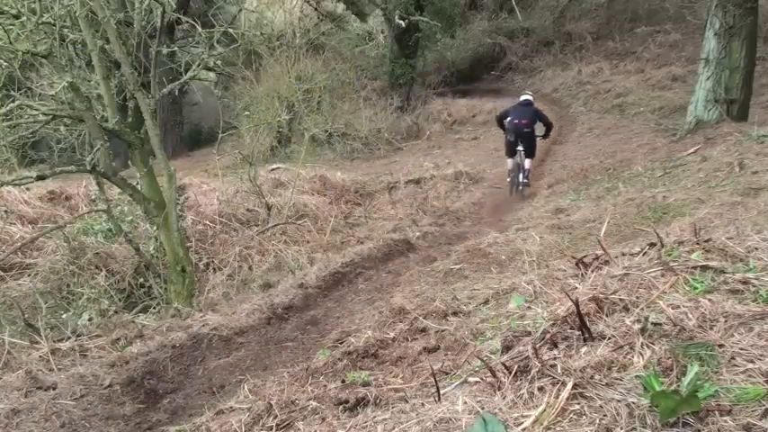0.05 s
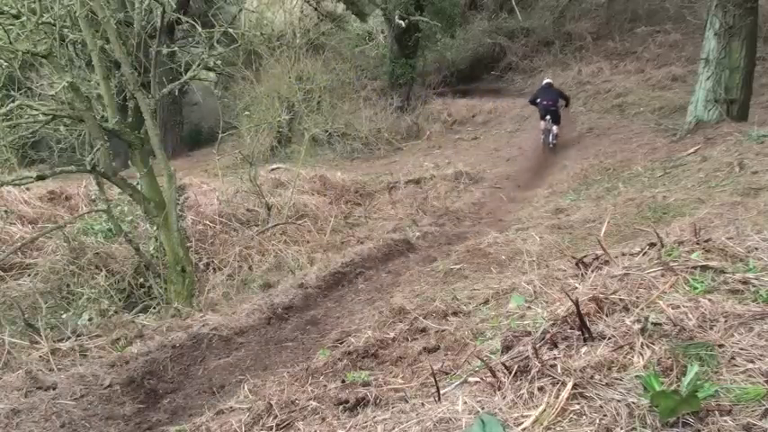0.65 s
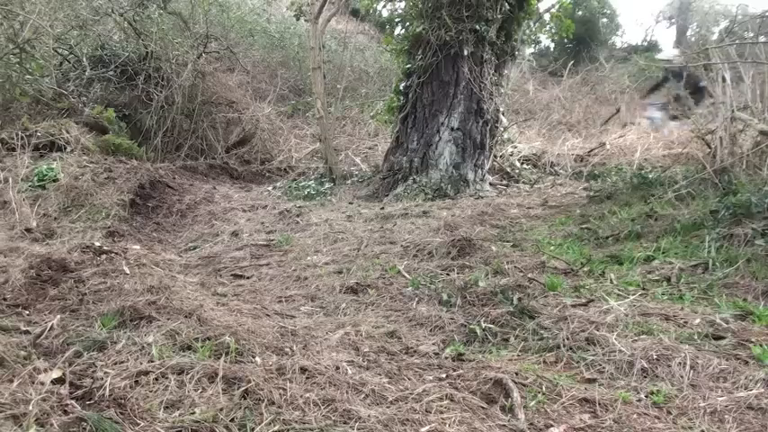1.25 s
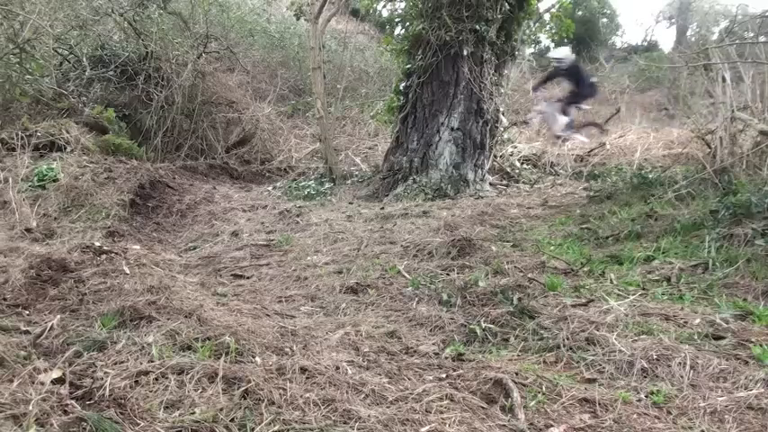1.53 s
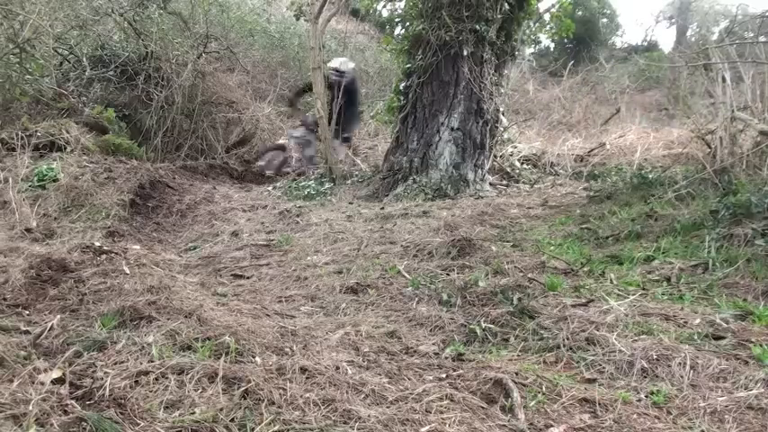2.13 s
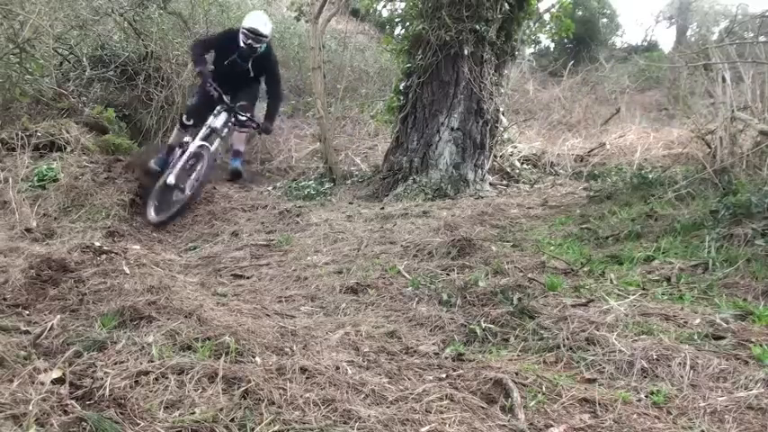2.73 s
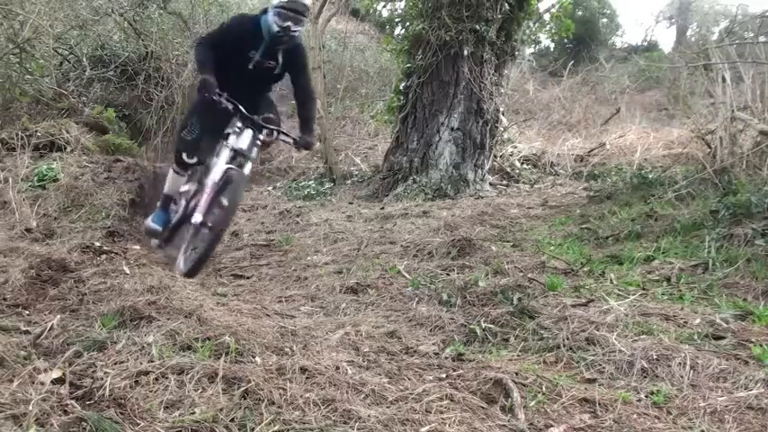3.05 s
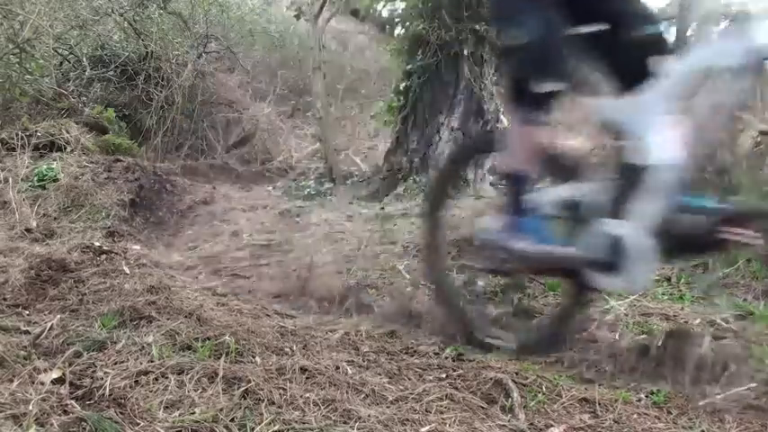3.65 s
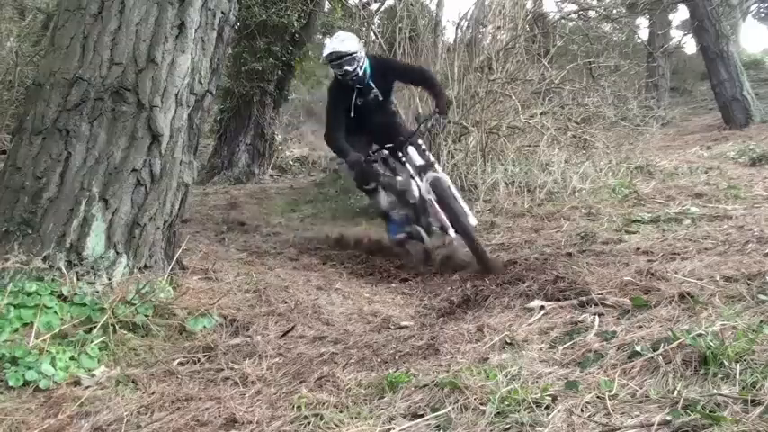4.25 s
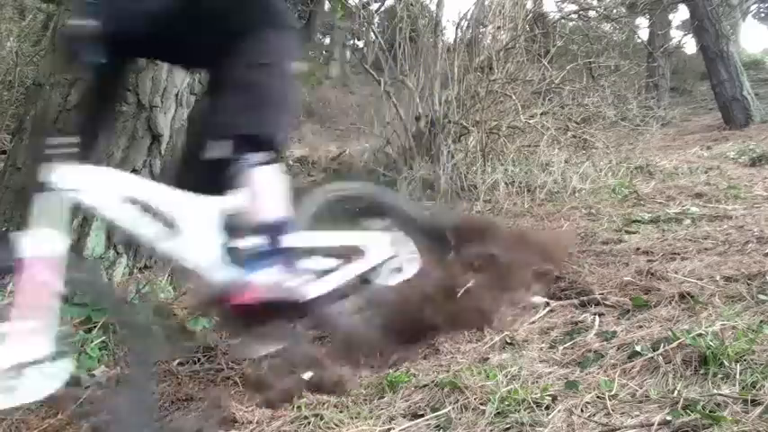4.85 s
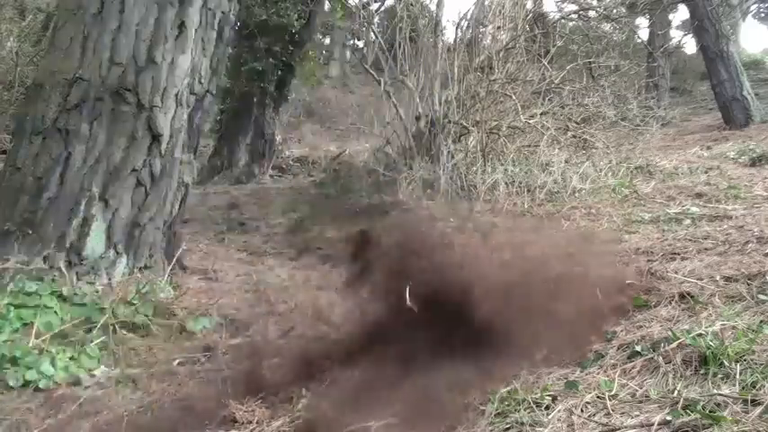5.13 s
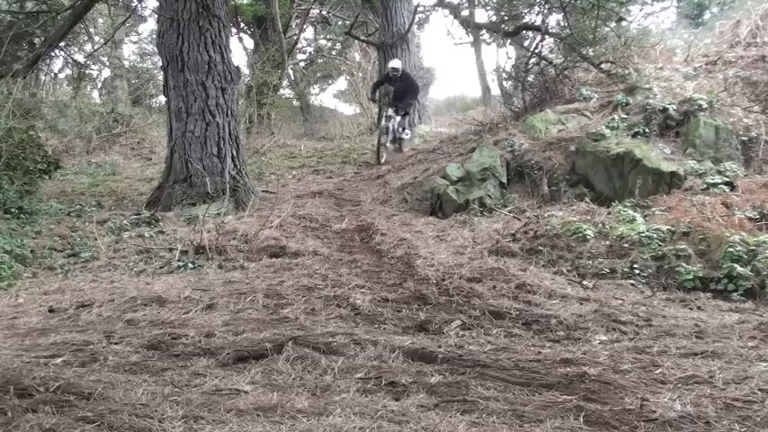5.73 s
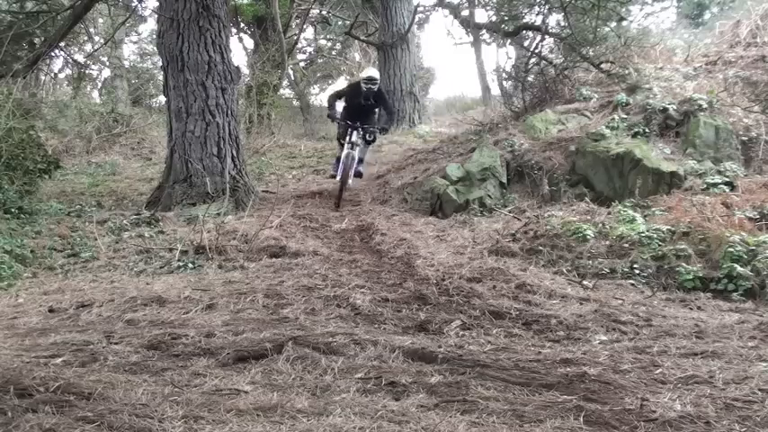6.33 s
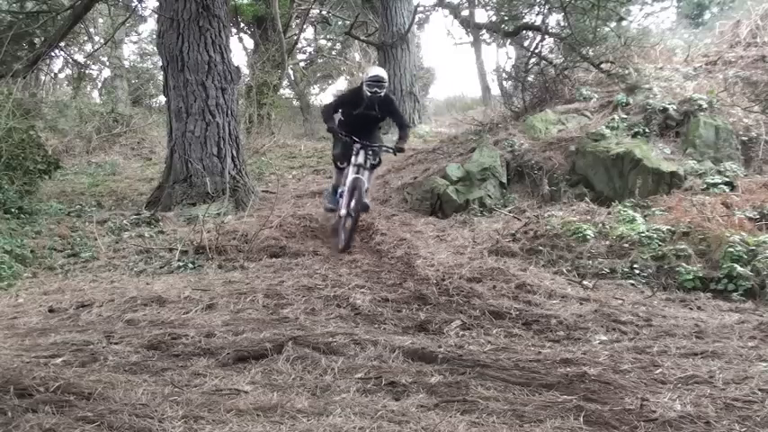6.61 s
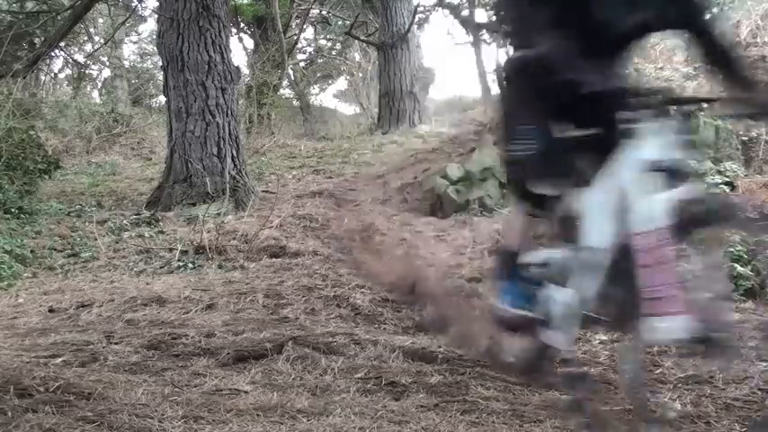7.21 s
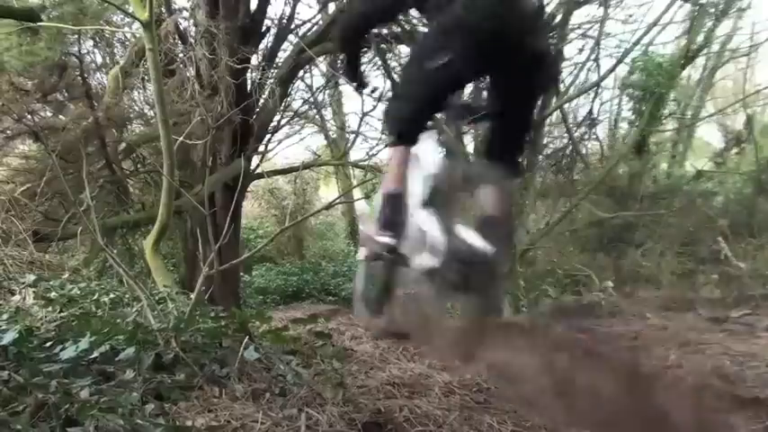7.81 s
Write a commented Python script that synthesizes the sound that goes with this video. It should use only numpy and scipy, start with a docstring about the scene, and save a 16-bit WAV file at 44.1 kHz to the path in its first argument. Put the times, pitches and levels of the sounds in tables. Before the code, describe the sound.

Coasting mountain bikes buzz and tick past, one far off and then several close, with crunching tyres, metal clacks and thin brake squeals.

```python
"""A dry woodland trail, stereo microphone at its edge: five short mountain bike passes, each fading out
as the next comes in, the first far off, the rest within about a metre at their nearest.
Freehub pawls buzz and set the wheels ringing, tyres crunch over dirt and needles, twigs snap,
loud pawl clicks and chain hits clack, and disc brakes squeal very high.
Wind buffets the microphone; dull thumps come from its puffs and from tyres on the ground."""
import sys
import numpy as np
from scipy import signal
from scipy.fft import rfft, irfft, next_fast_len
from scipy.io import wavfile

SR = 44100
rng = np.random.default_rng(int(sys.argv[2]) if len(sys.argv) > 2 else 0)


def unload_wav(signal):
    """Save mono or channel-first audio to the path in sys.argv[1] as 16-bit WAV at rate SR, clipped to [-1, 1]."""
    wavfile.write(
        sys.argv[1],
        SR,
        np.round(np.clip(np.atleast_2d(signal).T, -1, 1) * 32767).astype(np.int16),
    )


N = 347056
T = np.arange(N) / SR

# freewheeling: (time [s], pawl clicks [1/s], crispness [0 scattered wash to 1 direct clicks])
COASTING = [(.5, 112.7, .35), (.75, 89.4, .85), (.98, 90.1, .45), (1.7, 113.1, .3), (2.3, 66.1, .2),
            (3.3, 60.9, .35), (3.72, 52, .6), (3.98, 81.3, .68), (4.12, 38.2, .75), (4.47, 76.1, .5),
            (4.85, 31.1, .3), (4.95, 60.9, .86), (5.2, 59.9, .8), (5.5, 90, .05), (5.95, 92, .45),
            (6.55, 125, .15), (7.1, 112, .45), (7.7, 116, .5)]
# dips between passes: (start [s], quietest [s], end [s], first drop [dB], lowest level [dB])
LEVEL_DIPS = [(0.992, 1.049, 1.106, -0.5, -45), (3.996, 4.054, 4.14, -18.5, -40),
              (5.227, 5.325, 5.41, -16.5, -43), (7.45, 7.531, 7.604, -16.5, -45)]


def pawls(jitter_teeth=.025):
    """One click each time the pawls drop off a ratchet tooth."""
    per_s, _ = in_time(COASTING)
    teeth = np.maximum.accumulate(np.floor(np.cumsum(per_s) / SR + jitter_teeth * drift(30)))
    strength = from_db(1.7 * rng.standard_normal(N))
    return rms_one(np.diff(teeth, prepend=teeth[0]) * strength / np.sqrt(per_s))


def freehub(clicks, level_db, treble_db, shell_share):
    """Each pawl click is a crack and a short rattle in the hub shell, with a wash scattered by trees."""
    # tone of the buzz: (frequency [Hz], level [dB])
    spectrum = [(800, -14), (1200, -10.5), (1700, -5), (2400, -2), (3200, -4), (5500, -6), (8200, -6),
                (11800, -4), (15100, -10.5), (16000, -34)]
    # hub shell resonances: (frequency [Hz], width [Hz], level [dB])
    shell_modes = [(1820, 96, -3), (2363, 140, 3), (2600, 120, -3.5), (3200, 190, -14), (7370, 330, -3),
                   (10170, 820, -3), (11600, 330, -11)]
    # louder in the open, softer behind trunks or under braking: (middle [s], length [s], change [dB])
    buzz_swells = [(.75, 0.44, 6), (1.4, 1, 4), (1.72, 0.39, 10), (1.88, 0.26, -10.5), (2.85, 0.96, -3.5),
                   (3.3, 0.41, 2.5), (4.2, 0.6, 3.5), (4.64, .3, -5), (4.82, .3, -8), (5.62, 0.98, -2.5),
                   (6.74, 0.59, 3.5), (7.22, 0.41, -4)]
    _, crisp = in_time(COASTING)
    # the wheel answers every click alike, which gives the buzz its pitch
    age = np.arange(SR // 40) / SR
    answer = rng.standard_normal(len(age)) * np.exp(-age / 0.0018)
    wheel = rms_one(signal.fftconvolve(clicks, answer)[:N])
    rattle = rms_one(die_away(clicks, decay_s=0.0029) * stereo_noise(side_db=-18.5))
    wash = stereo_noise(side_db=-16.5) * from_db(2.34 * drift(44))
    direct = rms_one(0.24 * clicks + 0.69 * wheel + rattle)
    buzz = np.sqrt(crisp) * direct + np.sqrt(1 - crisp) * wash
    shell = sum(from_db(db) * resonate(buzz, hz, width) for hz, width, db in shell_modes)
    buzz = shelf(colour(buzz + shell_share * shell, spectrum), 6600, treble_db)
    return from_db(level_db + swells_db(buzz_swells)) * buzz


def tyres(level_db, bumps_db=1.63, grit_db=-8.5):
    """Knobs crush soil, stones and needles: grains crackle over a rush, shaken by the bumps."""
    # tyre rush: (frequency [Hz], level [dB])
    spectrum = [(150, -1.5), (400, -3.5), (700, -3.5), (1050, -6), (1300, -6), (2500, -13.5)]
    # the tread bites into loose ground or skims it: (middle [s], length [s], change [dB])
    skids = [(1.25, 0.46, 1.5), (2.3, 1.5, -1.5), (3.5, 0.68, 6), (5.7, 2.4, 1), (7.1, 0.39, -6),
             (7.37, 0.21, 5.5), (7.64, 0.12, 8)]
    crunch = rms_one(die_away(grains(500, spread_db=3), decay_s=0.0013) * stereo_noise(side_db=-10))
    grit = die_away(grains(280, spread_db=4), decay_s=0.00078) * stereo_noise(side_db=-9)
    grit = rms_one(band(grit, 1300, 8000))
    gain = from_db(level_db + swells_db(skids) + bumps_db * drift(18.7))
    rush = colour(0.65 * crunch + 0.76 * stereo_noise(side_db=-9.5), spectrum)
    return gain * (rush + from_db(grit_db) * grit)


def brakes(fade, flutter_db=3, attack_s=0.0016, waver_hz=200):
    """A dab of the pads sets the disc singing in a gliding, wavering tone; its echo follows the fade."""
    # squeals: (time [s], length [s], start pitch [Hz], end pitch [Hz], level [dB])
    squeals = [(.574, 0.021, 12700, 14130, -8), (.587, .016, 13900, 12860, -14),
               (.763, 0.039, 12560, 13100, -15.5), (.801, 0.033, 13500, 12450, -16),
               (0.882, 0.022, 12760, 12400, -23), (1.136, 0.092, 13140, 13300, -16),
               (1.293, .018, 13050, 13340, -14.5), (1.394, 0.027, 13050, 13500, -14.5),
               (1.812, .038, 13900, 14200, -16.5), (1.957, 0.085, 15500, 14730, -21),
               (2.01, 0.22, 14220, 14240, -16), (2.165, .06, 14900, 15500, -16.5),
               (2.306, .083, 15550, 15400, -14.5), (2.426, 0.044, 13400, 12870, -12.5),
               (2.578, .026, 14950, 14700, -18), (3.987, 0.052, 13000, 13400, -17.5),
               (4.643, 0.088, 15100, 15300, -17.5), (5.221, 0.092, 12620, 13700, -11.5),
               (7.448, 0.062, 13950, 14300, -13)]
    direct = np.zeros(N)
    waver, grip = drift(480), from_db(flutter_db * drift(130))
    for s, length, start_hz, end_hz, level_db in squeals:
        at = np.arange(round(s * SR), min(N, round((s + length) * SR)))
        progress = np.linspace(0, 1, len(at))
        hz = start_hz + (end_hz - start_hz) * progress + waver_hz * waver[at]
        attack = 1 - np.exp(-progress * length / attack_s)
        bite = attack * np.sqrt(np.abs(np.sin(np.pi * progress ** 0.48)))
        direct[at] += from_db(level_db) * bite * grip[at] * np.sin(2 * np.pi * np.cumsum(hz) / SR)
    echo = 0.86 * fade * woodland_echo(fade * direct)
    return signal.sosfilt(signal.butter(8, 11800, "high", fs=SR, output="sos"), direct + echo + 1e-18)


def drivetrain_clacks(ring_hz=2450, width_hz=500, ring_spread=0.093, decay_s=0.0055):
    """Loud irregular freehub clicks and chain hits: sharp metal clacks, each with its own ring."""
    # (time [s], level [dB])
    clacks = [(.585, -16), (2.498, -26), (2.625, -32), (3.771, -21), (3.813, -20), (3.87, -18.5),
              (3.9, -16.5), (3.93, -16), (3.958, -18), (4.607, -18), (4.717, -21), (4.842, -20.5),
              (4.874, -22.5), (4.911, -22), (4.941, -20), (5.002, -21), (5.044, -19.5), (5.433, -27.5),
              (6.554, -27.5), (6.588, -25.5), (6.693, -27), (6.719, -21.5), (6.796, -23), (6.89, -21),
              (7.355, -19), (7.412, -12), (7.425, -10.5), (7.442, -11.5)]
    out, noise = np.zeros((2, N)), stereo_noise(side_db=-13) * from_db(2.5 * drift(400))
    age = np.arange(SR // 20) / SR
    for (s, level_db), detune in zip(clacks, rng.standard_normal(len(clacks))):
        at = round(s * SR) + np.arange(len(age))
        burst = noise[:, at] * np.exp(-age / decay_s)
        hz = ring_hz * np.exp(ring_spread * detune)
        out[:, at] += from_db(level_db) * band(burst + 2.3 * resonate(burst, hz, width_hz), hz / 2, 10300)
    return out


def dull_thuds(attack_s=0.0018, band_ratio=1.51):
    """Tyres on the ground or wind puffs on the microphone: short dull thumps, each around one pitch."""
    # (time [s], level [dB], centre [Hz], decay [s])
    thuds = [(1.685, -24.5, 297, 0.02), (2.697, -26, 258, 0.037), (3.175, -30, 1100, .025),
             (3.393, -25, 1200, 0.01), (3.584, -24, 950, 0.019), (3.838, -19.5, 1010, 0.0089),
             (4.298, -32, 1150, 0.011), (4.472, -29, 1240, 0.023), (4.72, -32, 1200, .025),
             (4.783, -29, 845, 0.027), (5.22, -25, 1000, .006), (5.404, -29.5, 1100, 0.024),
             (6.433, -33.5, 810, 0.028), (6.566, -32, 650, 0.021), (7.2, -27, 400, .04),
             (7.273, -21, 400, .025), (7.304, -28, 850, .04), (7.351, -6.5, 650, .005),
             (7.404, -18.5, 790, 0.048)]
    out, noise = np.zeros((2, N)), stereo_noise(side_db=-12.5) * from_db(2 * drift(150))
    age = np.arange(SR // 5) / SR
    for s, level_db, hz, decay_s in thuds:
        at = round(s * SR) + np.arange(len(age))
        puff = rms_one(band(noise[:, at], hz / band_ratio, hz * band_ratio))
        out[:, at] += from_db(level_db) * puff * (1 - np.exp(-age / attack_s)) * np.exp(-age / decay_s)
    return out


def twigs(ring_hz=5000, width_hz=1500, crack_s=0.0018, splinter_s=0.012):
    """A twig breaks under a tyre: one crack, then a dying cluster of splinters, echoed by the trunks."""
    # snaps: (time [s], level [dB])
    snaps = [(0.408, -33), (.541, -29), (2.104, -32.5), (2.147, -29), (2.275, -30.5), (2.311, -27),
             (2.363, -29), (2.413, -26), (2.481, -29), (2.607, -27.5), (3.355, -16.5), (3.393, -22.5),
             (4.185, -27), (5.405, -26.5), (6.056, -30.5), (6.328, -27.5), (6.712, -18.5), (7.816, -10),
             (7.836, -15)]
    cracks, splinters = np.zeros(N), 0.4 * grains(500, spread_db=2)
    for s, level_db in snaps:
        at = round(s * SR)
        cracks[at] += from_db(level_db)
        dying = np.exp(-np.minimum(T[:N - at] / splinter_s, 20))
        cracks[at:] += from_db(level_db) * splinters[at:] * dying
    burst = die_away(cracks, crack_s) * stereo_noise(side_db=-16)
    direct = band(burst + resonate(burst, ring_hz, width_hz), ring_hz / 2, ring_hz * 2)
    return direct + 0.38 * woodland_echo(direct.mean(0))


def wheel_whirr(clicks, distance_db):
    """The pawls shake rotors and spokes, which ring: ticking close by, a sustained whirr from afar."""
    # narrow ringing bands: (start [s], end [s], start pitch [Hz], end pitch [Hz], level [dB])
    whirrs = [(0.679, 1.079, 2345, 2035, -38.5), (1.14, 1.3, 4620, 5150, -45.5),
              (1.2, 1.82, 2650, 2590, -41), (1.65, 1.8, 3450, 3550, -42), (1.58, 1.81, 4790, 4890, -41.5),
              (5.03, 5.242, 2150, 1650, -29.5)]
    direct = from_db(distance_db)
    ticks = rms_one(die_away(clicks * rng.standard_normal(N), decay_s=.001))
    shake = direct * ticks + np.sqrt(1 - direct ** 2) * drift(260)
    out = np.zeros(N)
    for start, end, start_hz, end_hz, level_db in whirrs:
        at = np.arange(round(start * SR), round(end * SR))
        swell = np.sqrt(np.abs(np.sin(np.linspace(0, np.pi, len(at)))))
        phase = 2 * np.pi * np.cumsum(np.linspace(start_hz, end_hz, len(at))) / SR
        out[at] += from_db(level_db) * swell * shake[at] * np.sin(phase)
    return out


def wind(level_db, buffet_db=2.5, small_eddies_hz=150):
    """Eddies on the microphone: big slow ones reach both sides, small ones differ and come and go."""
    # rumble: (frequency [Hz], level [dB])
    spectrum = [(20, 0.5), (60, 2.5), (120, -0.5), (208, -4.5), (350, -11), (690, -25.5), (1000, -34)]
    # gusts and lulls: (middle [s], length [s], change [dB])
    gusts = [(1.16, 0.24, 8.5), (1.35, 0.3, 4), (1.5, .12, 4), (1.72, 0.11, 4.5), (1.88, 0.14, -6),
             (1.96, 0.13, 6), (2.22, 0.6, 3), (2.54, .26, -12), (2.73, 0.12, 3), (3.01, 0.13, -6.5),
             (3.35, 1, 2), (3.62, 0.16, 7.5), (4.34, 0.11, 7), (5.15, 0.38, -7), (6.58, 0.23, 7),
             (7.38, 0.17, 7.5), (7.66, 0.24, 4)]
    # smoother air loses its small eddies: (middle [s], length [s], change above the rumble [dB])
    smooth_spells = [(2.18, 0.73, -6.5)]
    mid, side = rng.standard_normal((2, N))
    eddies = mid + from_db(-5.5) * band(side, 83, 1050) * [[1], [-1]]
    rumble = colour(band(eddies, 27.4, 1360), spectrum)
    gain = from_db(level_db + swells_db(gusts) + buffet_db * drift(28))
    return gain * shelf(rumble, small_eddies_hz, swells_db(smooth_spells))


def woodland_echo(x, t60_s=0.29):
    """Trunks and banks scatter a dense, short tail."""
    age = np.arange(SR * 3 // 4) / SR
    mid, side = rng.standard_normal((2, len(age)))
    tail = (mid + from_db(-29) * side * [[1], [-1]]) * from_db(-60 * age / t60_s) * (age > .004)
    return signal.fftconvolve(x[None], tail / np.sqrt(np.sum(tail[0] ** 2)), axes=1)[:, :N]


def dip_gain():
    """Between passes the level sinks briefly and swells back."""
    corners = []
    for start, low, end, drop_db, depth_db in LEVEL_DIPS:
        corners += [(start - .004, 0), (start + 0.0012, drop_db), (low, depth_db), (end, 0)]
    s, level_db = np.transpose(corners)
    return np.interp(T, s, from_db(level_db))


def nearness_db(along_m, nearest_m):
    """Level falls as one over distance from the microphone; 0 dB at the nearest point."""
    return 20 * np.log10(nearest_m / np.hypot(along_m, nearest_m))


def together_db(a_db, b_db):
    """Level of two unrelated sounds together."""
    return 20 * np.log10(np.hypot(from_db(a_db), from_db(b_db)))


def swells_db(rows):
    """Each row is a smooth swell or sag of level."""
    t = T[::64]
    level_db = sum(db * np.cos(np.pi * np.clip((t - s) / length, -.5, .5)) ** 2 for s, length, db in rows)
    return np.interp(T, t, level_db)


def in_time(rows):
    """Each column of a curve, sample by sample."""
    s, *columns = np.transpose(rows)
    return [np.interp(T, s, c) for c in columns]


def drift(rate_hz):
    """Smooth random wander of rms about 1."""
    step, settle = 40, 2000
    r = np.exp(-2 * np.pi * rate_hz * step / SR)
    slow = signal.lfilter([1], [1, -2 * r, r * r], rng.standard_normal(N // step + settle + 2))[settle:]
    return np.interp(np.arange(N) / step, np.arange(len(slow)), rms_one(slow))


def stereo_noise(side_db):
    """White noise with a given side level against the middle."""
    mid, side = rng.standard_normal((2, N))
    return rms_one(mid + from_db(side_db) * side * [[1], [-1]])


def grains(per_s, spread_db):
    """Random clicks, mostly small and a few large."""
    return (rng.random(N) < per_s / SR) * from_db(spread_db * np.minimum(rng.exponential(1, N), 4))


def die_away(x, decay_s):
    """Each click becomes an exponential tail of the same height."""
    return signal.lfilter([1], [1, -np.exp(-1 / (decay_s * SR))], x + 1e-18)


def resonate(x, hz, width_hz):
    """One resonance, gain 1 at its peak."""
    r = np.exp(-np.pi * width_hz / SR)
    feedback = [1, -2 * r * np.cos(2 * np.pi * hz / SR), r * r]
    return signal.lfilter(np.array([1, 0, -1]) * (1 - r * r) / 2, feedback, x + 1e-18)


def colour(x, spectrum, skirt_db_per_octave=15):
    """Shape by a spectrum whose ends fall away; rms 1."""
    hz, level_db = np.transpose(spectrum)
    size = next_fast_len(N + SR // 10)
    octave, known = np.log2(np.maximum(np.arange(size // 2 + 1) * SR / size, 1)), np.log2(hz)
    outside = np.abs(octave - np.clip(octave, known[0], known[-1]))
    gain = from_db(np.interp(octave, known, level_db) - skirt_db_per_octave * outside)
    return rms_one(irfft(rfft(x, size) * gain, size)[..., :N])


def band(x, low_hz, high_hz):
    """Band-pass with gentle skirts."""
    return signal.sosfilt(signal.butter(2, [low_hz, high_hz], "band", fs=SR, output="sos"), x + 1e-18)


def shelf(x, edge_hz, change_db):
    """Raise or lower everything above an edge."""
    top = signal.sosfiltfilt(signal.butter(2, edge_hz, "high", fs=SR, output="sos"), x)
    return x - top + from_db(change_db) * top


def widen(x, width_db):
    """Raise or lower the difference between the two sides."""
    return x.mean(0) + from_db(width_db) * (x - x.mean(0))


def from_db(db):
    return 10 ** (np.asarray(db) / 20)


def rms_one(x):
    return x / np.sqrt(np.mean(x ** 2) + 1e-20)


def scene(speed_m_per_s=5.06, front_lead_s=0.064, far_tyres_db=-46, treble_loss_db_per_db=0.19):
    """Each bike rides a straight line past the microphone; position sets level, brightness and pan."""
    # one row a pass: (nearest at [s], nearest distance [m], freehub when nearest [dB],
    # tyres when nearest [dB], draught when nearest [dB], breeze [dB], freehub treble [dB], width [dB],
    # left minus right coming [dB], left minus right going [dB], hub shell ring [gain])
    passes = [(-3, 8.1, -28.6, -37.5, -55, -50.5, 0.59, -6.5, -5.5, 0.9, 0.67),
              (4, 1.21, -26, -36.5, -33, -28, 1.34, 2, 1, -5, 0.62),
              (5, 1.06, -25, -42, -56, -41, 1.1, 0, -1, 8, 0.33),
              (7.5, 0.73, -21.5, -29, -25, -50.5, -0.33, -1, 0.5, -6, 0.43),
              (7.71, 0.58, -20.5, -29, -25, -44, 1.8, 1.5, -10.5, 4, 0.59)]
    # each pass hands over at the bottom of a dip
    current = np.searchsorted([low for _, low, *_ in LEVEL_DIPS], T)
    (nearest_s, nearest_m, hub_db, tyre_db, draught_db, breeze_db,
     treble_db, width_db, coming_db, going_db, shell_share) = np.array(passes)[current].T
    along_m = speed_m_per_s * (T - nearest_s)
    rear_db = nearness_db(along_m, nearest_m)
    # the front tyre and the draught arrive before the rear hub
    front_db = nearness_db(along_m + speed_m_per_s * front_lead_s, nearest_m)
    pan_db = coming_db + (going_db - coming_db) * (.5 + np.arctan2(along_m, nearest_m) / np.pi)
    fade = dip_gain()
    rolling = tyres(together_db(tyre_db + front_db, far_tyres_db))  # direct, plus scatter from the wood
    clicks = pawls()
    hub = freehub(clicks, hub_db + rear_db, treble_db + treble_loss_db_per_db * rear_db, shell_share)
    air = wind(together_db(draught_db + front_db, breeze_db))
    riding = rolling + hub + wheel_whirr(clicks, rear_db) + drivetrain_clacks() + twigs() + dull_thuds()
    passing = widen(fade * riding + brakes(fade), width_db)
    return passing * from_db(pan_db * np.array([[.5], [-.5]])) + widen(fade * air, width_db)


def record(dry, cutoff_hz=16100):
    """The recorder rounds the peaks and cuts the top."""
    rounded = 1.19 * np.tanh(dry / 1.223)
    return signal.sosfilt(signal.ellip(10, .1, 80, cutoff_hz, fs=SR, output="sos"), rounded)


dry = scene()
out = record(dry)
unload_wav(out)
```